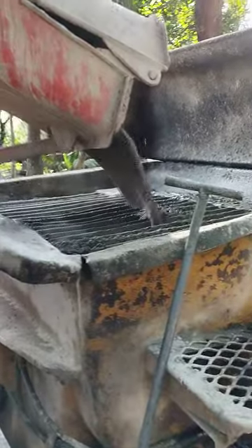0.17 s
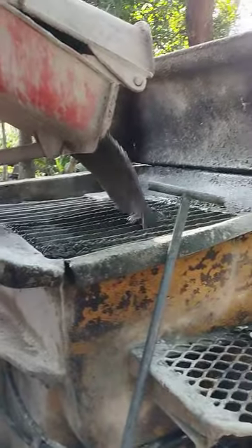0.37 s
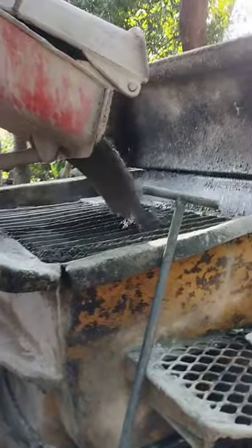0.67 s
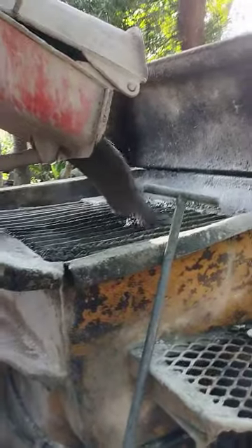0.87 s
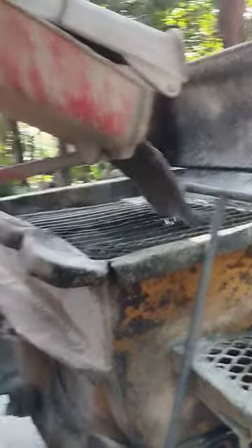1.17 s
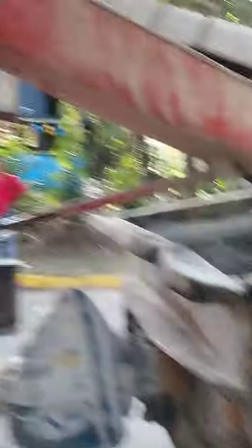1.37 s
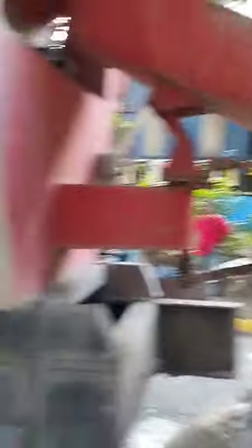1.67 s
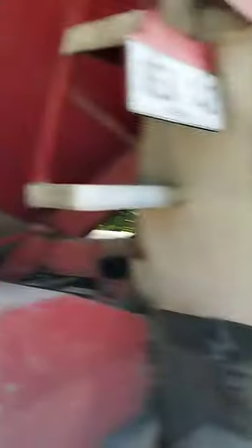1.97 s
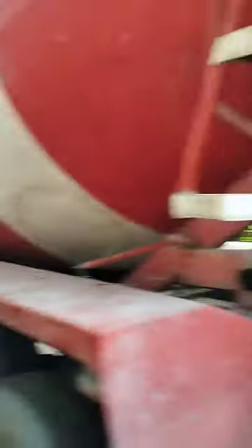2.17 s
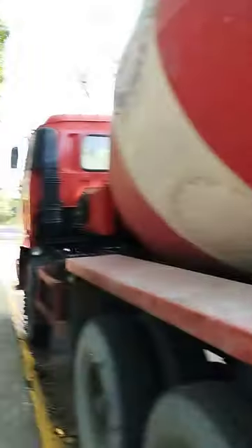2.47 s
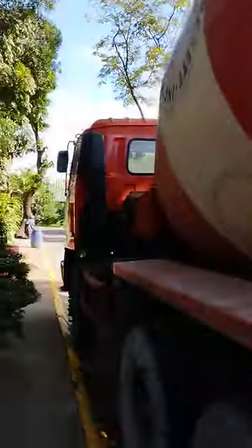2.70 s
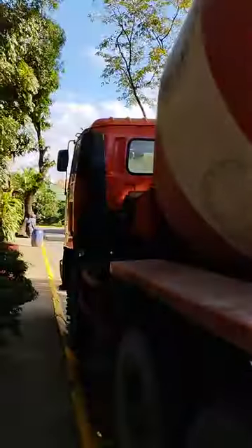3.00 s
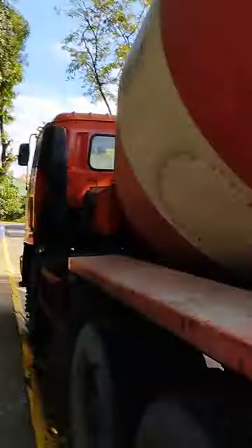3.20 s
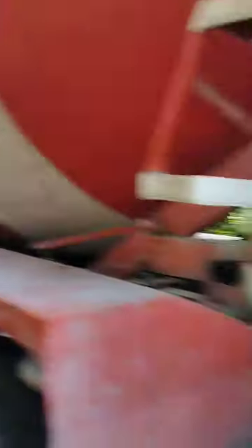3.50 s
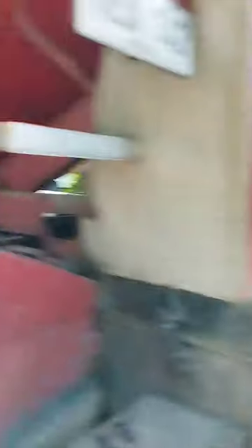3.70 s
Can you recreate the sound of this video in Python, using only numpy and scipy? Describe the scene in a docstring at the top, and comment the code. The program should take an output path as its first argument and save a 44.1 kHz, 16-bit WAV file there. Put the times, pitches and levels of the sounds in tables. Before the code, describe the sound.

Close outdoor phone pickup of heavy diesel roar with a wavering hydraulic hum; a sharp tick, the pump slowing, a cluster of low knocks with a short falling groan, then steady truck engine and faint clatter.

```python
"""A concrete pump's diesel runs under load, then sheds it and coasts down, close to a handheld phone outdoors.
Beside it a mixer truck's diesel hunts around its speed and drives a humming hydraulic pump; both engines are
sums of wavering sines locked to the engine cycle. Valve thuds and stones ticking on steel are short bursts of
resonant noise, the valve's groan is a falling sine, clatter is random decaying sines, the roar is shaped noise."""
import sys
import numpy as np
from scipy import signal
from scipy.fft import rfft, irfft
from scipy.io import wavfile
from scipy.ndimage import uniform_filter1d

SR = 44100
rng = np.random.default_rng(int(sys.argv[2]) if len(sys.argv) > 2 else 0)


def dump_mix(stems):
    """Bounce the given channels to the path in sys.argv[1] as a 16-bit WAV at rate SR."""
    frames = np.atleast_2d(stems).T  # one column per channel
    limited = np.clip(frames, -1, 1)  # hard clip at full scale
    pcm = np.round(limited * 32767).astype(np.int16)
    wavfile.write(sys.argv[1], SR, pcm)


N = 169785
T = np.arange(N) / SR
# phone aim: (time [s], turn from pump 0 to truck 1 [-])
FACING = [(0, 0.18), (1.2, 0), (1.9, 0.39), (2.6, 1), (3.3, 1), (3.85, 1)]
# stereo balance of the ports: (frequency [Hz], left minus right [dB])
LEAN = [(25, 6), (60, 3.2), (90, -0.5), (160, 0.5), (270, 1), (400, 1.7), (550, -0.8), (790, 0.5),
        (1140, -3.5), (1650, -3), (2380, -3), (3440, -4), (4970, -4), (7180, -7.5), (10400, 8), (15000, 1)]


def amp(db):
    """Decibels to amplitude."""
    return 10 ** (np.asarray(db) / 20)


def evened(x):
    """Scale to rms 1."""
    return x / np.sqrt(np.mean(x ** 2) + 1e-20)


def read(points, hz):
    """Spectral curve, interpolated over log frequency."""
    f, value = np.transpose(points)
    return np.interp(np.log(hz + 1), np.log(f + 1), value)


def curves(table, t):
    """Time curves, one per column after the first."""
    rows = np.transpose(table)
    return [np.interp(t, rows[0], column) for column in rows[1:]]


def add(mix, start_s, sound):
    """Mix a sound in place, cut at the end."""
    part = mix[..., round(start_s * SR):][..., :sound.shape[-1]]
    part += sound[..., :part.shape[-1]]


def drift(top_hz, t):
    """Slow random curve of rms 1: sines of random phase up to top_hz."""
    f = np.geomspace(.3, top_hz, num=12)[:, None]
    coarse_s = np.linspace(0, N / SR, num=800)
    sines = np.sin(2 * np.pi * (f * coarse_s + rng.random(f.shape)))
    return np.interp(t, coarse_s, evened(sines.sum(axis=0)))


def tone(turns, level, waver_db):
    """Sine of given rms level whose level wavers slowly by waver_db rms."""
    waver_top_hz = 7.2
    envelope = np.sqrt(2) * level * amp(waver_db * drift(waver_top_hz, T))
    return envelope * np.sin(2 * np.pi * (turns + rng.random()))


def ring(x, hz, width_hz):
    """Resonance of gain 1: shift to 0 Hz, one-pole low-pass, shift back."""
    turn = np.exp(2j * np.pi * hz * np.arange(len(x)) / SR)
    r = np.exp(-np.pi * width_hz / SR)
    return 2 * (turn * signal.lfilter([1 - r], [1, -r], x / turn)).real


def burst(noise, rise_s, length_s, hz, width_hz):
    """Noise through a double resonance, rising fast and dying by 30 dB over its length."""
    t = np.arange(len(noise)) / SR
    shape = (1 - np.exp(-t / rise_s)) ** 2 * amp(-30 * t / length_s)
    sound = ring(ring(noise, hz, width_hz), hz, width_hz) * shape
    return sound * np.linalg.norm(shape) / np.linalg.norm(sound)


def port_response(hz):
    """Left and right port: opposite colours, and a later arrival at the left."""
    lag_s = 0.00018
    lean = amp(read(LEAN, hz) / 2)
    return np.array([lean * np.exp(-2j * np.pi * hz * lag_s), 1 / lean])


def ports(x):
    """A mono source reaching both ports."""
    return irfft(rfft(x) * port_response(np.fft.rfftfreq(N, 1 / SR)), N)


def pump():
    """Pump diesel: exhaust tones at multiples of the cycle rate; load blends two patterns."""
    # engine state: (time [s], cycle rate [Hz], load 0-1 [-], coasting level [dB])
    engine = [(0, 13.44, 0.97, -5), (.7, 13.44, 1, -7), (1.33, 13.44, .95, -12), (1.5, 12.7, .6, 2),
              (1.62, 11.9, 0.02, -2.5), (1.8, 11.1, 0.08, -6), (2.0, 10.1, .02, -5.5), (2.25, 8.6, 0, -32),
              (2.5, 7.6, .01, -14), (2.8, 6.6, 0, -3), (3.1, 6.4, 0.02, -21), (3.85, 6.4, .01, -27)]
    # exhaust tones: (multiple of cycle rate [-], level under load [dB], level coasting [dB])
    tones = [(3.87, -41, -48), (4.823, -43, -22), (7, -22, -40), (8.06, -13.5, -47), (9, -32, -50),
             (10, -28.5, -16), (11.95, -27.5, -27), (13.16, -34.5, -36), (14.43, -37, -38), (15, -50, -38),
             (17.23, -40.5, -31), (20.12, -37, -37), (23.4, -31.5, -37)]
    waver_db = .6
    rate_hz, load, coast_db = curves(engine, T)
    turns = np.cumsum(rate_hz) / SR
    out = np.zeros(N)
    for multiple, loaded_db, coasting_db in tones:
        level = load * amp(loaded_db) + (1 - load) * amp(coasting_db + coast_db)
        out += tone(multiple * turns, level, waver_db)
    return out


HUM_ORDER, FIRING_ORDER = 36, 6  # multiples of the truck engine cycle


def truck_turns():
    """Truck engine cycles elapsed, from its hunting speed."""
    # speed as hum pitch: (time [s], frequency [Hz])
    speed = [(0, 406), (.15, 406.3), (.42, 404), (.7, 399.9), (1.0, 394), (1.45, 391.7), (1.7, 395.2),
             (2.0, 396.3), (2.19, 396.3), (2.27, 403.5), (2.45, 410), (2.75, 402.2), (3.0, 396.7),
             (3.3, 392.3), (3.85, 394.4)]
    hum_hz = uniform_filter1d(curves(speed, T)[0], size=2000)
    return np.cumsum(hum_hz / HUM_ORDER) / SR


def truck():
    """Truck diesel: hydraulic hum, firing tone, weaker tones and gear whine, locked to the cycle."""
    # main tones: (time [s], hum level [dB], firing tone level [dB])
    main_levels = [(0.0, -25, -29), (0.08, -25, -29), (0.4, -24, -25), (0.63, -24.5, -38), (0.71, -17, -33),
                   (0.95, -19, -22), (1.46, -19, -23), (1.5, -31, -29), (1.55, -21.5, -40),
                   (1.66, -13.5, -24), (2.23, -26.5, -29), (2.27, -40, -26), (2.32, -18.5, -20),
                   (2.71, -19, -27), (2.79, -21, -28), (2.82, -37, -31), (2.88, -17, -21),
                   (3.01, -20.5, -23.5), (3.17, -18, -31), (3.26, -15, -20.5), (3.82, -18.5, -27),
                   (3.85, -21, -24)]
    # weaker tones: (multiple of cycle rate [-], level facing pump [dB], level facing truck [dB])
    weak_tones = [(15, -31, -32), (16.02, -34, -38.5), (17.9, -34.5, -27.5), (19.9, -32.5, -34.5),
                  (23.93, -33.5, -34), (27.95, -35, -42), (35.24, -31, -33.5), (36.87, -41, -58),
                  (41.7, -37.5, -34), (45.4, -39.5, -30.5), (50.5, -36, -35.5), (53.6, -38, -33),
                  (59.5, -42.5, -33.5), (65.76, -37.5, -38), (84.1, -35.5, -41), (94, -41, -35.5)]
    # gear whine: (multiple of cycle rate [-], level facing pump [dB], level facing truck [dB])
    whines = [(300, -51, -51), (600, -53, -55)]
    main_waver_db, weak_waver_db = .5, 1
    turns = truck_turns()
    hum_db, firing_db = curves(main_levels, T)
    facing = curves(FACING, T)[0]
    out = tone(HUM_ORDER * turns, amp(hum_db), main_waver_db)
    out += tone(FIRING_ORDER * turns, amp(firing_db), main_waver_db)
    for multiple, pump_side_db, truck_side_db in [*weak_tones, *whines]:
        level_db = pump_side_db + (truck_side_db - pump_side_db) * facing
        out += tone(multiple * turns, amp(level_db), weak_waver_db)
    return out


def thuds():
    """Dull blows of the swing valve in the hopper: low resonant bursts."""
    # blows: (time [s], level [dB], pitch [Hz], length [s])
    blows = [(2.028, -18, 210, 0.027), (2.12, -5, 349.6, 0.025), (2.144, -3, 315, 0.04),
             (2.191, -17, 250, 0.036), (2.334, -22, 230, 0.063), (2.382, -8.5, 262, 0.087),
             (2.429, -8, 300, 0.042), (2.455, -8, 190, 0.052), (2.683, -26, 169.2, 0.045)]
    rise_s, width_hz = 0.0024, 300
    out = np.zeros(N)
    for start_s, level_db, hz, length_s in blows:
        noise = rng.standard_normal(6000)
        add(out, start_s, amp(level_db) * burst(noise, rise_s, length_s, hz, width_hz))
    return out


def sag():
    """A low groan falling in pitch as the valve settles."""
    start_s, length_s, peak_db = 2.13, .24, -19
    from_hz, fall_hz_per_s = 205, 400
    out, t = np.zeros(N), np.arange(0, length_s, 1 / SR)
    turns = from_hz * t - fall_hz_per_s * t ** 2 / 2 + rng.random()
    envelope = amp(peak_db) * np.sin(np.pi * t / length_s) ** .5
    add(out, start_s, envelope * np.sin(2 * np.pi * turns))
    return out


def ticks():
    """Stones on steel: short noise rattles, each coloured around its centre."""
    # stones: (time [s], level [dB], centre [Hz], width [Hz], left minus right [dB], length [s])
    stones = [(0.337, -16, 2580, 2500, 0, 0.025), (0.744, -19, 2996, 3000, 0, .012),
              (1.041, -12, 4190, 2500, 0, 0.013), (1.153, -18, 3700, 2500, -3, 0.013),
              (1.3082, -2.5, 3740, 2400, -7, 0.0074), (1.314, -12, 2420, 2030, -1, 0.021),
              (1.872, -23, 3300, 2500, -1, 0.011), (2.137, -4, 5000, 9000, -9, 0.0089),
              (2.31, -18, 2780, 3000, -5, 0.029), (2.402, -15.5, 3792, 3000, -2, 0.019),
              (2.575, -14.5, 2471, 2200, -9, 0.026), (2.579, -11, 4300, 4510, -6, 0.023),
              (3.1477, -13.5, 3030, 2200, -9, 0.025), (3.3378, -17.5, 3170, 3000, -12, 0.016)]
    rise_s, likeness = 0.00096, .6  # likeness: left-right noise correlation
    out = np.zeros((2, N))
    for start_s, level_db, hz, width_hz, pan_db, length_s in stones:
        a, b = rng.standard_normal((2, 3000))
        right = likeness * a + np.sqrt(1 - likeness ** 2) * b
        pair = [burst(noise, rise_s, length_s, hz, width_hz) for noise in (a, right)]
        add(out, start_s, amp(level_db + np.array([[.5], [-.5]]) * pan_db) * pair)
    return out


def clatter():
    """Small random metallic ticks of valves and gravel: decaying sines at eight pitches."""
    ticks_per_s, rms_db, spread_db = 220, -42, 2  # rate per channel, all pitches
    out, t = np.zeros((2, N)), np.arange(400) / SR
    for hz in np.geomspace(1800, 6500, num=8):
        size = amp(spread_db * np.minimum(rng.exponential(1, (2, N)), 4))
        hits = size * (rng.random(N) < ticks_per_s / 8 / SR)  # same instants left and right
        grain = np.sin(2 * np.pi * hz * t) * np.exp(-t * hz / 5.2)
        out += signal.oaconvolve(hits, grain[None], axes=1)[:, :N]
    return amp(rms_db) * evened(out)


def dulled(x):
    """Hard sounds lose most of their treble: low-pass plus a weak direct part."""
    edge_hz, direct_db = 5250, -17
    return signal.lfilter(*signal.butter(6, edge_hz, fs=SR), x) + amp(direct_db) * x


def roar():
    """Broad engine noise with patches; the treble flickers and pulses once per truck cycle."""
    # spectrum before rms scaling: (frequency [Hz], density [dB per Hz])
    spectrum = [(12, -41), (22, -12), (33, -8), (50, -13), (80, -9), (113, -7), (187, -5.5), (301, -9),
                (400, -8.5), (511, -13), (800, -13), (1180, -13.5), (1560, -17), (2000, -18.5), (3140, -25),
                (5980, -26), (7480, -34.5), (8360, -45), (9620, -39.5), (11100, -47.5), (12400, -38),
                (14200, -36), (15900, -36.5)]
    # level, used relative to each mean: (time [s], below split [dB], above split [dB], top band [dB])
    levels = [(0.0, -19.5, -25.5, -42.5), (0.59, -18, -23.5, -39.5), (0.95, -19.5, -24, -42),
              (1.34, -21, -24.5, -43), (1.62, -19.5, -23.5, -42), (1.94, -16.5, -23, -42),
              (2.37, -17, -23, -41.5), (2.64, -18, -23.5, -42), (2.78, -18.5, -22, -40.5),
              (2.95, -19.5, -22, -40.5), (3.29, -20.5, -22, -42), (3.85, -18, -23, -41.5)]
    # colour added when turned to the truck: (frequency [Hz], gain [dB])
    turned = [(40, 5), (100, -1.5), (170, -0.5), (280, -2.5), (550, 1), (850, -1.5), (1500, .5),
              (3000, 1.5), (5000, -1), (9000, .1)]
    # stereo likeness: (frequency [Hz], left-right correlation [-])
    likeness = [(60, 0.87), (200, 0.98), (380, 0.81), (600, 0.64), (900, 0.38), (1400, 0.35), (2200, 0.26),
                (3500, 0.021), (15000, .01)]
    # treble sinks after each group of thuds: (time [s], half width [s], gain [dB])
    treble_dips = [(2.22, 0.053, -2), (2.5, 0.069, -3)]
    rms_db, split_hz, treble_hz, top_hz = -16, 580, 620, 8100
    patch_db, flicker_db, cycle_db = 1.07, 0.48, -0.52  # rms, rms, peak

    frames, hz = N // 128 + 5, np.fft.rfftfreq(512, 1 / SR)
    t = np.arange(frames) * 128 / SR
    a, b, c, d, patch = rng.standard_normal((5, 257, frames))
    patch = evened(uniform_filter1d(uniform_filter1d(patch, size=8, axis=0), size=16, axis=1))
    flicker = evened(uniform_filter1d(rng.standard_normal(frames), size=10))
    cycle = np.cos(2 * np.pi * (np.interp(t, T, truck_turns()) + rng.random()))
    dips_db = sum(db * np.exp(-((t - s) / half_s) ** 4) for s, half_s, db in treble_dips)

    low_db, high_db, top_db = [level - level.mean() for level in curves(levels, t)]
    upper, treble = [(1 / (1 + (f / (hz + 1)) ** 2))[:, None] for f in (split_hz, treble_hz)]
    upper_db = np.where((hz > top_hz)[:, None], top_db, high_db)
    field_db = (1 - upper) * low_db + upper * (upper_db + patch_db * patch)
    field_db += read(turned, hz)[:, None] * curves(FACING, t)[0]
    field_db += treble * (flicker_db * flicker + dips_db + cycle_db * cycle)
    noise = np.array([a + 1j * b, c + 1j * d])
    pair = signal.istft(noise * amp(field_db), nperseg=512, noverlap=384)[1][:, :N]

    f = np.fft.rfftfreq(N, 1 / SR)
    one, two = rfft(pair) * amp(read(spectrum, f))
    same = read(likeness, f)
    right = same * one + np.sqrt(1 - same ** 2) * two
    return amp(rms_db) * evened(irfft(np.array([one, right]) * port_response(f), N))


def scene():
    """Engines and valve through the ports, plus the stereo roar and hard sounds."""
    return ports(pump() + truck() + thuds() + sag()) + dulled(ticks() + clatter()) + roar()


def record(dry):
    """Soft overload of the small microphones, then the band limit."""
    ceiling, knee, edge_hz = .97, 4, 15880
    soft = dry / (1 + abs(dry / ceiling) ** knee) ** (1 / knee)
    low_pass = signal.firwin(1023, edge_hz, window=("kaiser", 10), fs=SR)
    return signal.oaconvolve(soft, low_pass[None], "same", axes=1)


dry = scene()
out = record(dry)
dump_mix(out)
```